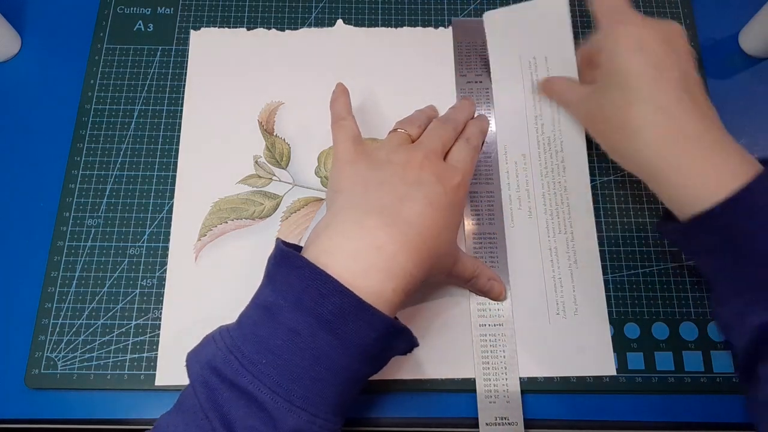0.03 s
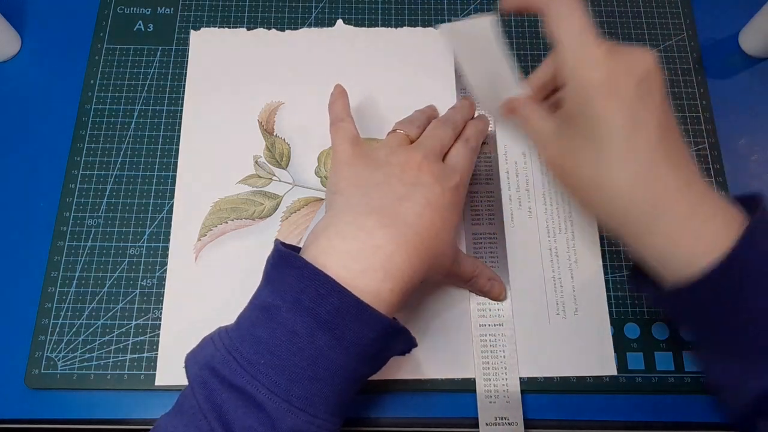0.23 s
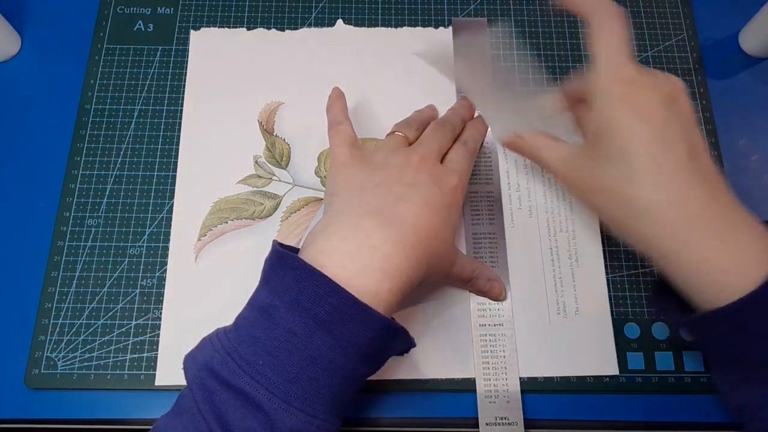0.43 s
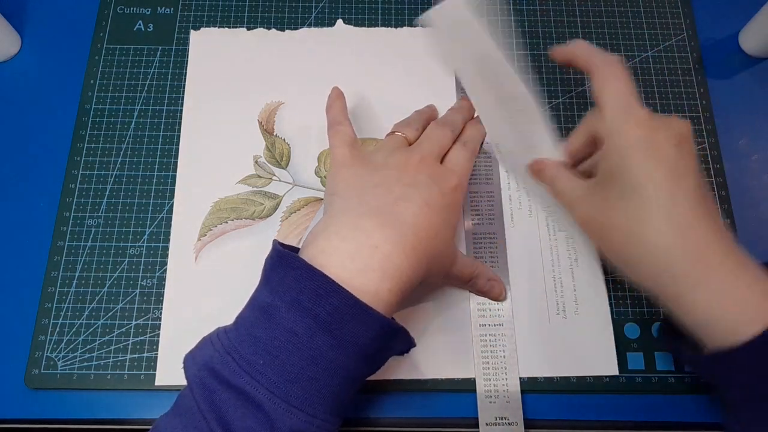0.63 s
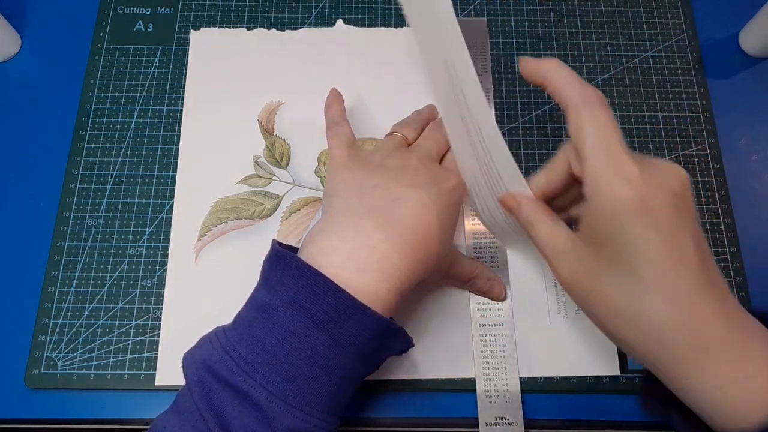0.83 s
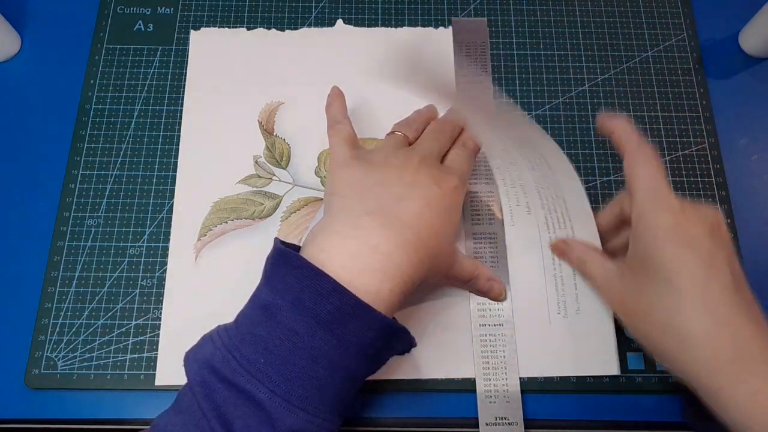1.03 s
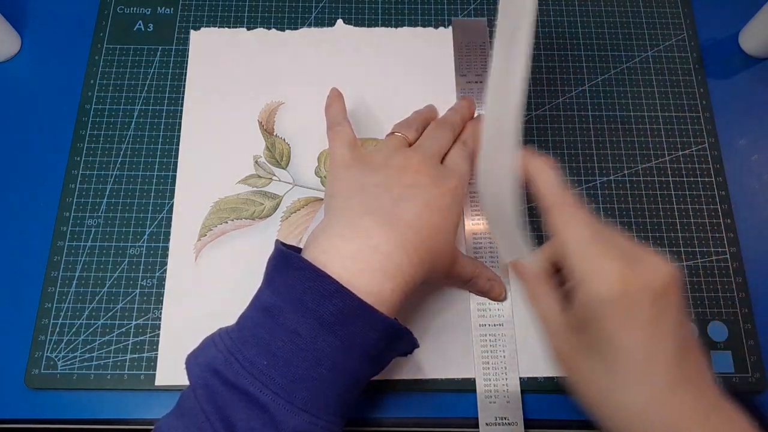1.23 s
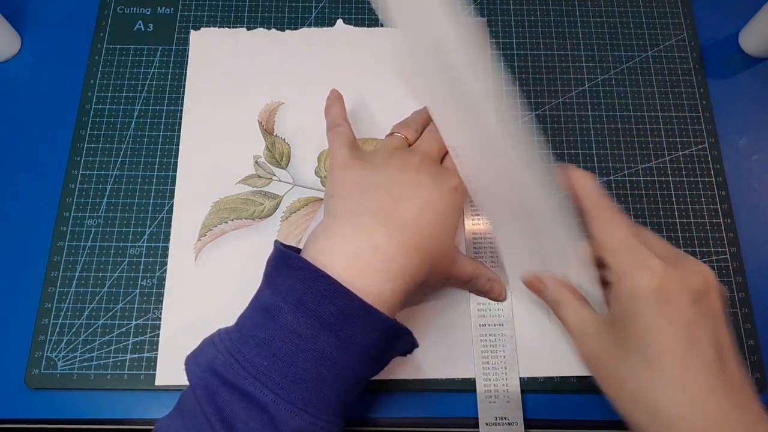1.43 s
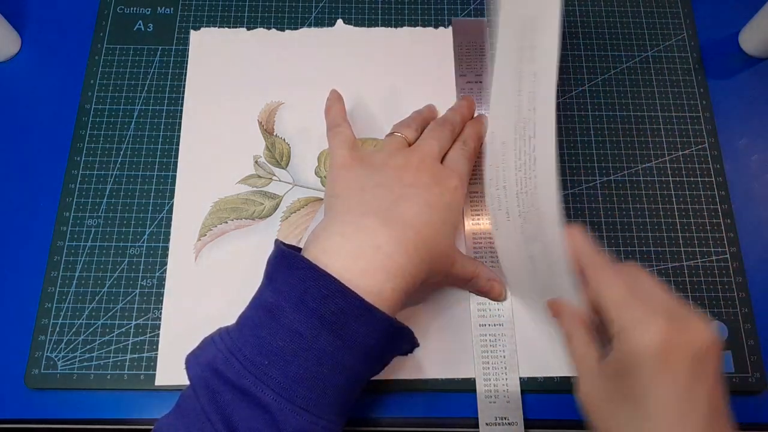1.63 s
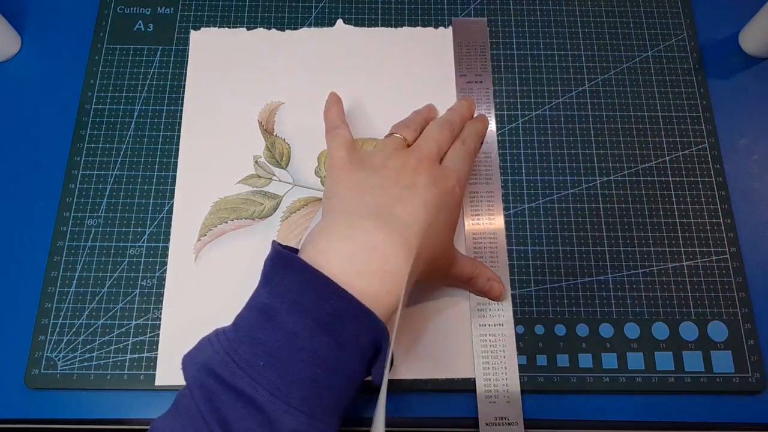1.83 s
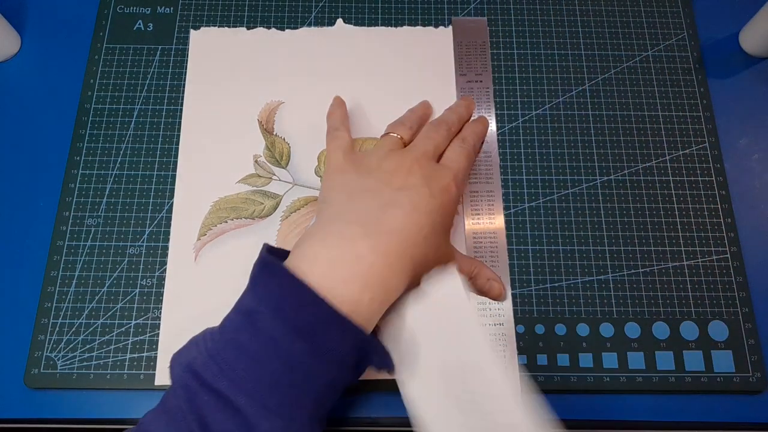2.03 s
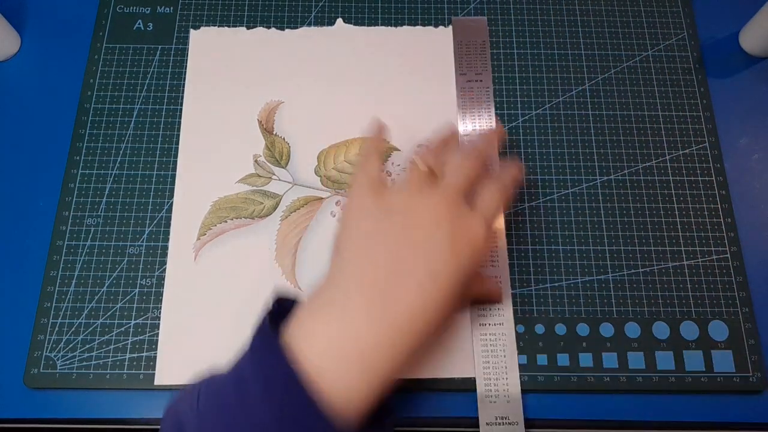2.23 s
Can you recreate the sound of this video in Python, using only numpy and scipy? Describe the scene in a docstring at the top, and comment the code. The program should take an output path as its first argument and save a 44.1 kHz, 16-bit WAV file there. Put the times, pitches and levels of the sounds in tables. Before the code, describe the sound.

Four brief rips of a large paper sheet, about half a second apart, each harsh and fibrous with a low flutter; the loose strip rustles and snaps between, heard close and dry in a small room.

```python
"""A strip is torn off a large page along a steel ruler in four short pulls, on a mat under a close pair of microphones.
Tearing is dense tiny clicks of breaking fibres that ring in the sheet; the sheet flutters and the desk hums along.
Between pulls the loose strip rustles (faint clicks) and snaps (struck short rings), fibres slip in short bursts
and fingers thud on the mat. A small room of feedback delays and a low rumble of shaped noise lie below."""
import sys
import numpy as np
from scipy import signal
from scipy.fft import rfft, irfft, next_fast_len
from scipy.io import wavfile
from scipy.ndimage import uniform_filter1d

SR = 44100
rng = np.random.default_rng(int(sys.argv[2]) if len(sys.argv) > 2 else 0)


def master(y):
    """Save y as 16-bit WAV."""
    cut = np.clip(np.atleast_2d(y).T, -1, 1)
    pcm = np.round(cut * 32767)  # scale
    wavfile.write(sys.argv[1], SR, pcm.astype(np.int16))


def convert_level_to_amplitude(level_db):
    """Map a level in decibels to its linear amplitude factor."""
    exponent = np.asarray(level_db, float) / 20
    return 10 ** exponent


N = 100680
HZ = np.maximum(np.arange(N // 2 + 1) * SR / N, 1)


def rms_one(x):
    """Scale to rms 1."""
    return x / np.sqrt(np.mean(x ** 2) + 1e-20)


def column(rows, index, outside):
    """One column of a curve, sample by sample."""
    rows = np.array(rows)
    return np.interp(np.arange(N) / SR, rows[:, 0], rows[:, index], left=outside, right=outside)


def at_hz(points):
    """A spectrum table on the FFT grid, interpolated over log frequency."""
    hz, value = np.transpose(points)
    return np.interp(np.log(HZ), np.log(hz), value)


def drift(rate_hz):
    """Slow chance of spread 1: noise through two equal one-pole low-passes."""
    r = np.exp(-2 * np.pi * rate_hz / SR)
    slow = signal.lfilter([1], [1, -2 * r, r * r], rng.standard_normal(N + SR))
    return rms_one(slow[SR:])


# Left against right. Each row: frequency in Hz, left over right in dB.
LEFT_OVER_RIGHT = [(60, 0.5), (110, -1), (200, 6.5), (380, -1.5), (700, 3), (1290, 8.5), (2380, 8),
                   (4400, 3.5), (8120, 5.5), (15000, 5)]
# Likeness of the ears. Each row: frequency in Hz, share of power common to both ears.
ALIKE = [(100, 0.99), (400, 1), (1200, 0.33), (5000, 0.44), (9000, 0.055), (15000, 0.073)]
# Phase of the right ear. Each row: frequency in Hz, further lag in radians.
RIGHT_TURN = [(300, -0.29), (800, 0.72), (1400, -0.073), (2500, 0.69), (4000, -0.43)]
RIGHT_LATE_S = 0.00022


def two_ears(common, own):
    """Spectra at both ears: part is shared, the right one late and duller; the rest is their own."""
    alike = np.clip(at_hz(ALIKE), 0, 1)
    lag_rad = 2 * np.pi * HZ * RIGHT_LATE_S + at_hz(RIGHT_TURN)
    late = np.exp(-1j * lag_rad * np.array([[0], [1]]))
    tilt = convert_level_to_amplitude(at_hz(LEFT_OVER_RIGHT) / 2 * np.array([[1], [-1]]))
    return tilt * (np.sqrt(alike) * late * rfft(common) + np.sqrt(1 - alike) * rfft(own))


FIBRE_SPREAD_DB = 2.0


def clicks(per_s):
    """Breaking fibres: random clicks of uneven size and either sign, rms 1."""
    size_db = FIBRE_SPREAD_DB * np.minimum(rng.exponential(1, N), 5)
    sizes = convert_level_to_amplitude(size_db) * rng.choice([-1, 1], N)
    return rms_one(sizes * (rng.random(N) < per_s / SR))


CLUMP_HZ, PATCH_HZ = 139.3, 23
SHEET_RIPPLE_DB, SHEET_RIPPLE_HZ = 2.5, 92


def crackle(spectrum, per_s, clump_db, patch_db, body_db=0, rasp_db=0):
    """Clumped clicks ring in the sheet's crowded modes, each region of pitch swelling on its own."""
    clumps = convert_level_to_amplitude(clump_db * drift(CLUMP_HZ))
    width = int(SHEET_RIPPLE_HZ * N / SR)
    modes = uniform_filter1d(rng.standard_normal(len(HZ)), width)
    modes = rms_one(uniform_filter1d(modes, width))
    own = np.array([clicks(per_s), clicks(per_s)])
    heard = two_ears(clumps * clicks(per_s), clumps * own)
    heard = heard * convert_level_to_amplitude(at_hz(spectrum) + SHEET_RIPPLE_DB * modes)
    place = np.clip(np.log2(HZ / 300) * 1.5, 0, 8)  # 2/3 octave steps from 300 Hz
    parts = []
    for k in range(9):
        region = irfft(heard * np.clip(1 - abs(place - k), 0, 1), N)
        parts.append(convert_level_to_amplitude(patch_db * drift(PATCH_HZ)) * region)
    mid_power = uniform_filter1d(sum(parts).mean(axis=0) ** 2, size=4000)
    body, rasp = sum(parts[:5]), parts[6]  # up to about 2 kHz; about 5 kHz
    out = convert_level_to_amplitude(body_db) * body + convert_level_to_amplitude(rasp_db) * rasp + parts[5] + sum(parts[7:])
    return out / np.sqrt(np.median(mid_power))  # level before body_db and rasp_db


def ring(click, hz, cycles):
    """A click sets one mode ringing; it falls 60 dB in the given cycles."""
    r, w = convert_level_to_amplitude(-60 * hz / (cycles * SR)), 2 * np.pi * hz / SR
    return signal.lfilter([0, np.sin(w)], [1, -2 * r * np.cos(w), r * r], click)


def blow(s, db, soft_hz):
    """One click, dulled by a soft contact."""
    click, r = np.full(N, 1e-18), np.exp(-2 * np.pi * soft_hz / SR)
    click[int(s * SR)] = convert_level_to_amplitude(db)
    return signal.lfilter([(1 - r) ** 2], [1, -2 * r, r * r], click)


def struck_pair(x):
    """A struck sound at both ears; the right one's own part comes 9 samples later."""
    return irfft(two_ears(x, np.array([x, np.roll(x, 9)])), N)


# House hum and microphone hiss. Each row: frequency in Hz, relative density in dB per Hz.
RUMBLE = [(15, -25.5), (30, -19), (60, 5), (90, -6.5), (170, -14.5), (500, -24.5), (1000, -36),
          (3000, -47.5), (8000, -35), (10000, -38), (15800, -42.5)]
RUMBLE_DB = -72


def rumble():
    """Low hum of the house and microphone hiss: shaped noise, partly shared by both ears."""
    noise = rng.standard_normal((3, N))
    pair = noise[:2] + 0.88 * noise[2]
    pair = irfft(rfft(pair) * convert_level_to_amplitude(at_hz(RUMBLE)), N)
    return convert_level_to_amplitude(RUMBLE_DB + 0.5 * drift(6.3)) * rms_one(pair)


ROOM_T60_S, WALL_CUT_HZ = 0.15, 3000


def room(x):
    """Eight feedback delays a side, duller on every round."""
    size = next_fast_len(N + SR)
    hz, heard = np.arange(size // 2 + 1) * SR / size, rfft(x, size)
    loops = []
    for lag_s in rng.uniform(.008, .03, 16):
        wall = convert_level_to_amplitude(-60 * lag_s / ROOM_T60_S) / (1 + 1j * hz / WALL_CUT_HZ)
        loops.append(wall * np.exp(-2j * np.pi * hz * lag_s))
    tails = [sum(g / (1 - g) * (-1) ** k for k, g in enumerate(loops[side::2])) for side in (0, 1)]
    return irfft(heard * np.array(tails), size)[:, :N]


# A finger meets the mat. Each row: start in seconds, blow level in dB, pitch in Hz.
THUDS = [(0.585, -59, 336), (1.64, -47, 357), (2.2468, -60.5, 620), (2.261, -62, 550)]
THUD_CYCLES, THUD_SOFT_HZ = 9.0, 874


def thuds():
    """Fingers thud on the mat: a soft blow rings one low mode."""
    out = sum(ring(blow(s, db, THUD_SOFT_HZ), hz, THUD_CYCLES) for s, db, hz in THUDS)
    return struck_pair(out)


# The strip buckles. Each row: start in seconds, blow level in dB, tilt about 1 kHz in dB per octave.
SNAPS = [(0.1, -54, -3.5), (0.6664, -33, 7.5), (1.1952, -35, -7), (1.6436, -31.5, -16), (1.655, -38, -19.5),
         (1.718, -26, -7), (2.247, -61.5, -13)]
# Rings of the strip. Each row: frequency in Hz, level in dB, cycles to fall 60 dB.
SNAP_RING = [(1036, -5, 6), (1340, 1.5, 7.6), (2330, 4, 3.5), (3450, 1, 13.1), (5030, -10.5, 7.0),
             (6600, -4.5, 7.1), (8000, -15.5, 8.0)]
SNAP_CUT_HZ, SNAP_SOFT_HZ = 500, 9000
REPEAT_DB, REPEAT_PER_TILT = -7.5, 0.6  # second: dB of repeats per dB of tilt


def snaps():
    """Each buckle strikes the strip's short rings at chance strengths; two repeats, louder in crisp ones."""
    out = np.zeros(N)
    chance_db = rng.normal(0, 1, (len(SNAPS), len(SNAP_RING)))
    for (s, db, tilt_db), chances in zip(SNAPS, chance_db):
        click = blow(s, db, SNAP_SOFT_HZ)
        repeats = np.roll(click, 50) + np.roll(click, 87)
        click = click + convert_level_to_amplitude(REPEAT_PER_TILT * tilt_db + REPEAT_DB) * repeats
        for k, ((hz, ring_db, cycles), chance) in enumerate(zip(SNAP_RING, chances)):
            level_db = ring_db + tilt_db * np.log2(hz / 1000) + chance
            out += (-1) ** k * convert_level_to_amplitude(level_db) * ring(click, hz, cycles)
    high = signal.butter(2, SNAP_CUT_HZ, "high", fs=SR, output="sos")
    return struck_pair(signal.sosfilt(high, out))


# A few fibres let go. Each row: start in seconds, level in dB before SLIP_DB, strongest pitch in Hz.
SLIPS = [(0.1642, -47.5, 5000), (0.635, -41, 6000), (0.6874, -25, 3600), (0.7056, -26.5, 7000),
         (0.709, -24, 3500), (1.0165, -60, 5000), (1.0812, -45, 5000), (1.2068, -37, 5500),
         (1.2236, -30.5, 6500), (1.2502, -23.5, 5300), (1.2552, -27, 3400), (1.5864, -57.5, 5000),
         (1.644, -39.5, 5600), (1.649, -43.5, 5300), (1.7239, -32.5, 7500), (2.0707, -69, 4000)]
# Colour of the slips. Each row: frequency in Hz, relative density in dB per Hz.
SLIP = [(500, -29.5), (1200, -12.5), (3500, -10), (7500, 3), (9300, -4.5), (12000, 0.5), (15800, -4.5)]
SLIP_T60_S, SLIP_DB, SLIP_CYCLES, SLIP_BROAD_DB = 0.02, -11.5, 15, -3.5


def slips():
    """Short slips of fibre: decaying bursts of crackle, heard broad and through one ring."""
    out = np.zeros((2, N))
    fibres = crackle(SLIP, per_s=9000, clump_db=0.5, patch_db=-1)
    after = np.arange(SR // 20)
    for s, db, hz in SLIPS:
        now = int(s * SR) + after
        burst = convert_level_to_amplitude(db + SLIP_DB - 60 * after / (SLIP_T60_S * SR)) * fibres[:, now]
        out[:, now] += convert_level_to_amplitude(SLIP_BROAD_DB) * burst + ring(burst, hz, SLIP_CYCLES) * hz / SR
    return out


# Strip and fingers slide, one list a stretch. Each row: time in seconds, level in dB,
# relative level of the 1 kHz region in dB.
RUSTLES = [
    [(0.0, -61, 3.5), (0.058, -73.5, -2), (0.097, -67.5, -8), (0.102, -58, 0), (0.154, -80.5, 5.5),
     (0.19, -66, -6.5)],
    [(0.39, -54, 12), (0.47, -57.5, -0.5), (0.502, -80, 2), (0.575, -66, -8), (0.595, -55.5, 1),
     (0.625, -71.5, -5), (0.667, -63, -2)],
    [(0.9, -62, 3), (0.93, -66.5, 2), (0.964, -61.5, 2), (1.04, -81, 2), (1.078, -86.5, 1.5),
     (1.082, -65, -4.5), (1.156, -76.5, -3.5), (1.2, -65, 8)],
    [(1.4, -62, 4), (1.498, -75.5, -0.5), (1.654, -66, 5.5), (1.68, -77.5, -1), (1.72, -68, 12.5)],
    [(1.9, -63.5, 8.5), (2.056, -72.5, -1.5), (2.134, -67.5, -6), (2.216, -79.5, 0.5), (2.283, -84.5, 2.5)],
]
# Colour of the rustle. Each row: frequency in Hz, relative density in dB per Hz.
RUSTLE = [(180, -7.5), (400, -11.5), (1000, -9.5), (2000, -8), (3300, -1.5), (5500, -3), (8300, -1.5),
          (9500, -10.5), (15800, -9)]


def rustling():
    """Faint sliding of paper on paper and skin: very dense crackle."""
    level = sum(convert_level_to_amplitude(column(rows, index=1, outside=-150)) for rows in RUSTLES)
    body_db = sum(column(rows, index=2, outside=0) for rows in RUSTLES)
    return level * crackle(RUSTLE, per_s=27000, clump_db=2.5, patch_db=-0.5, body_db=body_db)


# Four pulls, one list each. Each row: time in seconds, tearing level in dB,
# the sheet's low flutter in dB over the tearing, relative level of the 1 kHz region in dB.
PULLS = [
    [(0.18, -78.5, -34, -24), (0.208, -39.5, -21, 5), (0.284, -29, -8.5, -2), (0.336, -29, -24.5, -2.5),
     (0.352, -35, -14, 4.5), (0.372, -35, -21.5, -4), (0.383, -50, -15, -14), (0.41, -62, -16, -32)],
    [(0.669, -46, -28, 7), (0.677, -49, -14, 9.5), (0.723, -45.5, -9, 10), (0.739, -31.5, -10.5, 6.5),
     (0.785, -29, -9, 0.5), (0.867, -36.5, -15.5, 2), (0.899, -58.5, -11, 4), (0.93, -73.5, -24, -9)],
    [(1.198, -69.5, -2.5, 16), (1.242, -57.5, -13, 8), (1.256, -47, -16, -0.5), (1.294, -35.5, -17, 6),
     (1.322, -38, -9, 2.5), (1.34, -35.5, -11.5, 3.5), (1.368, -42, -17, 4.5), (1.388, -56, -6.5, 9),
     (1.42, -79, -9, 5)],
    [(1.72, -58.5, -15, 11), (1.756, -37, -20, -1), (1.798, -26.5, -23, 0), (1.812, -26.5, -23, 2.5),
     (1.824, -37.5, -18, 9.5), (1.854, -45.5, -4, 1.5), (1.888, -59, -15, 3.5), (1.95, -77.5, -7.5, -13)],
]
# Colour of each pull as the strip grows and turns. Each row: frequency in Hz, relative density in dB per Hz.
TEAR_A = [(350, -20.5), (600, -24.5), (669, -7), (768, -12), (1350, -9.5), (1840, -16), (2260, -9.5),
          (4130, -7.5), (4870, -3.5), (5580, -8.5), (6860, -4.5), (9270, -13), (15800, -15.5)]
TEAR_B = [(350, -38), (600, -15), (707, -10.5), (1040, -1), (1270, -8.5), (3100, -3.5), (5980, -1.5),
          (6490, -0.5), (9390, -7.5), (14200, -7), (15800, -14.5)]
TEAR_C = [(350, -32), (600, -27), (747, 0), (822, -15), (1080, -1.5), (1820, -11.5), (2110, -6),
          (3910, -3.5), (5140, -2), (5900, -1), (10300, -8.5), (14800, -7.5), (15800, -15.5)]
TEAR_D = [(350, -32), (600, -14), (1020, -7.5), (1260, -13.5), (1400, -5.5), (1970, -16.5), (2740, -5.5),
          (3810, -9), (5290, -3.5), (5900, -8), (8530, -8), (9270, -15), (15800, -16)]
# Low flutter of the sheet. Each row: frequency in Hz, relative density in dB per Hz.
FLUTTER = [(100, -46.5), (165, -19), (230, -11), (340, -5), (400, -6.5), (480, -2), (590, -10.5),
           (800, -24.5), (1100, -54.5)]
# The desk hums along. Each row: frequency in Hz, relative density in dB per Hz.
DESK = [(50, -41), (85, -19), (125, -1.5), (160, -24.5), (250, -36)]
# Desk in each pull. Each value: level over the flutter in dB.
DESK_DB = [-10.5, -4.5, -6, -10]
FIBRES_PER_S, CLUMP_DB, PATCH_DB = 14000, 1.5, 2.0
SLOW_CLUMP = 0.02  # extra clumping, dB per dB below a pull's peak
RASP_PEAK_DB, RASP_FADE = 1, 0.26  # 5 kHz rasp at a pull's peak; dB lost per dB below it


def tearing():
    """Each pull breaks fibres, in jerks while it is slow, and shakes sheet and desk."""
    out = 0
    flutter = crackle(FLUTTER, per_s=3400, clump_db=.5, patch_db=3)
    desk = crackle(DESK, per_s=2300, clump_db=-2.0, patch_db=4.0)
    for rows, colour, desk_db in zip(PULLS, (TEAR_A, TEAR_B, TEAR_C, TEAR_D), DESK_DB):
        level_db = column(rows, index=1, outside=-150)
        flutter_db = level_db + column(rows, index=2, outside=0)
        body_db = column(rows, index=3, outside=0)
        slack_db = np.minimum(level_db.max() - level_db, 30)
        clump_db = CLUMP_DB + SLOW_CLUMP * slack_db
        rasp_db = RASP_PEAK_DB - RASP_FADE * slack_db
        fibres = crackle(colour, FIBRES_PER_S, clump_db, PATCH_DB, body_db, rasp_db)
        out = out + convert_level_to_amplitude(level_db) * fibres
        out = out + convert_level_to_amplitude(flutter_db) * (flutter + convert_level_to_amplitude(desk_db) * desk)
    return out


ROOM_DB = -12.5


def scene():
    """Paper and fingers, their room, and the rumble."""
    paper = tearing() + rustling() + slips() + snaps() + thuds()
    return paper + convert_level_to_amplitude(ROOM_DB) * room(paper.mean(axis=0)) + rumble()


def band_limit(x):
    """A steep low-pass at the top of the band."""
    return signal.sosfilt(signal.butter(12, 16810, fs=SR, output="sos"), x)


def record(dry):
    """A steep low-pass cuts the top, 40 dB down from 16.1 kHz."""
    low_pass = signal.cheby2(12, 40, 16100, fs=SR, output="sos")
    mix = signal.sosfilt(low_pass, dry)
    return band_limit(mix)


dry = scene()
out = record(dry)
master(out)
```